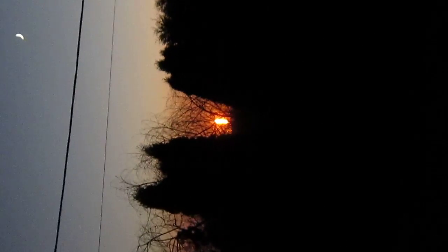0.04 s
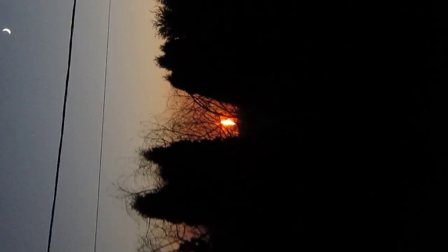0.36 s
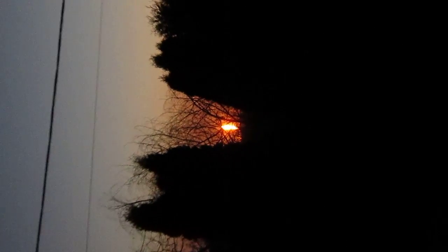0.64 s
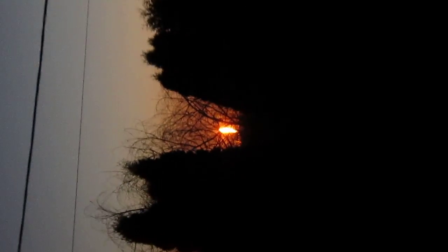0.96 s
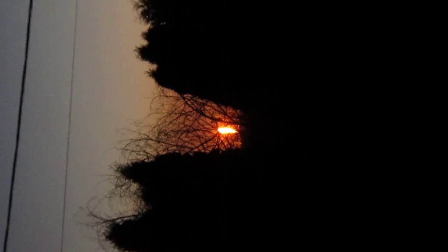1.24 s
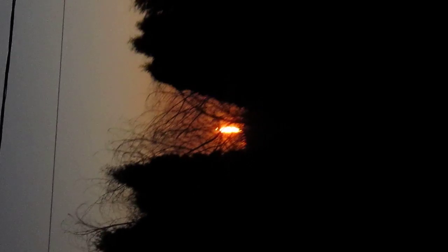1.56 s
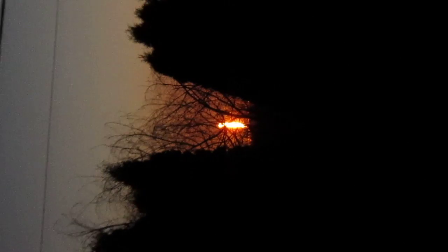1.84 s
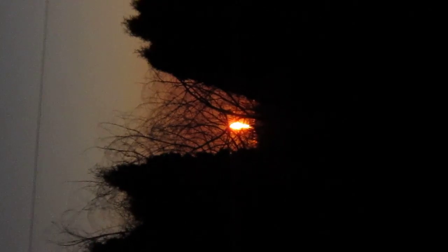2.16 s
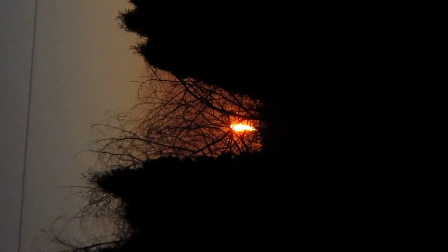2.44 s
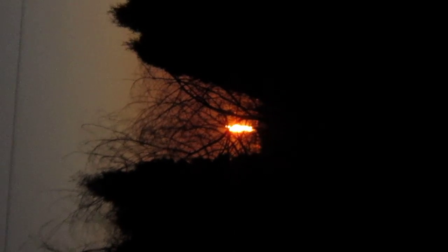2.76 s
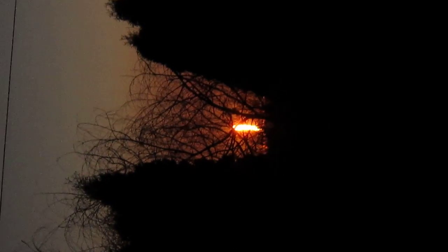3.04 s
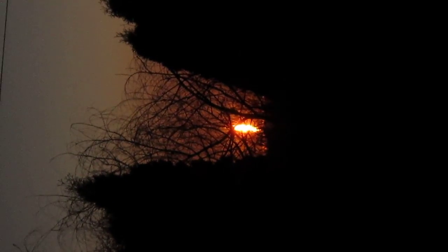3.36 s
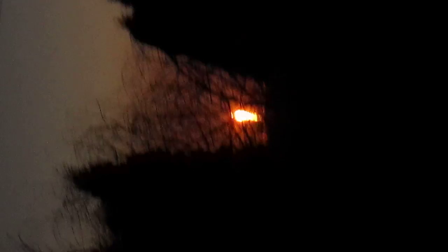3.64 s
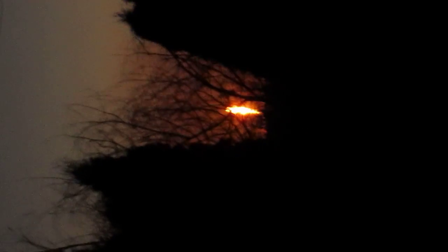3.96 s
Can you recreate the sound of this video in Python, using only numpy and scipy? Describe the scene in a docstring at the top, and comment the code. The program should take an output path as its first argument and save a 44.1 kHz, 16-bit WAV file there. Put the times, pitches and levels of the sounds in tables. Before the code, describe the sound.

Outdoors, over a steady far-off roar and light wind rumbling on the microphone, a camera lens zooms with a quiet, ticking motor whirr. Late on, the camera body gives a sharp click and brief scuffs just before the motor stops.

```python
"""A camera's zoom motor whirrs close by: its steps ring the lens housing, it ticks once a turn,
and now and then its gears catch. Near the end come a sharp click and short scuffs on the camera
body, and the motor stops. Behind it, outdoors at dusk: a steady distant roar, light wind
rumbling on the microphone, and the camera's faint hiss and hum."""
import sys
import numpy as np
from scipy.fft import rfft, irfft, next_fast_len
from scipy.io import wavfile
from scipy.ndimage import map_coordinates

SR = 44100
rng = np.random.default_rng(int(sys.argv[2]) if len(sys.argv) > 2 else 0)


def dump(signal):
    """Clip the signal to [-1, 1] and save it as 16-bit WAV at the path in sys.argv[1]."""
    limited = np.clip(np.atleast_2d(signal).T, -1, 1)
    pcm = np.round(limited * 32767).astype(np.int16)
    wavfile.write(sys.argv[1], SR, pcm)


N = 176400
TIME_S = np.arange(N) / SR


def amp(db):
    """Decibels to gain."""
    return 10 ** (np.asarray(db) / 20)


def unit(x):
    """Scale to rms 1."""
    return x / np.sqrt(np.mean(x ** 2) + 1e-20)


def envelope(rows):
    """Gain per sample from (time_s, level_db) rows."""
    return amp(np.interp(TIME_S, *np.transpose(rows)))


def wobble(rate_hz):
    """Smooth random curve."""
    return map_coordinates(rng.standard_normal(int(N * rate_hz / SR) + 4), [TIME_S * rate_hz])


def coloured(x, spectrum):
    """Minimum-phase, unit-energy filter from (freq_hz, gain_db) rows; 48 dB/octave skirts."""
    size = 2 * next_fast_len(N // 2 + SR // 4)
    freq_hz, gain_db = np.transpose(spectrum)
    octave, knots = np.log2(np.fft.rfftfreq(size, 1 / SR) + 1), np.log2(freq_hz)
    outside = np.abs(octave - np.clip(octave, knots[0], knots[-1]))
    gain = amp(np.maximum(np.interp(octave, knots, gain_db) - 48 * outside, -120))
    cepstrum = irfft(np.log(unit(gain)), size)
    cepstrum[1:size // 2] *= 2
    cepstrum[size // 2 + 1:] = 0
    return irfft(rfft(x, size) * np.exp(rfft(cepstrum)), size)[:N]


def noise(spectrum):
    """Coloured noise, rms 1."""
    return unit(coloured(rng.standard_normal(N), spectrum))


def strikes(hits, modes, rise_s=.0001, scatter_db=1):
    """Each hit rings the decaying modes in a slightly new mix."""
    t, out = np.arange(SR // 20) / SR, np.zeros(N + SR)
    pitch_hz, mode_db, t60_s = np.transpose(modes)[:, :, None]
    for start_s, level_db in hits:
        mix, phase = rng.standard_normal((2, len(pitch_hz), 1))
        decay = amp(level_db + mode_db + scatter_db * mix - 60 * t / t60_s)
        ring = decay * np.sin(2 * np.pi * (pitch_hz * t + phase))
        out[round(start_s * SR):][:len(t)] += ring.sum(0) * (1 - np.exp(-t / rise_s))
    return out[:N]


# Roar and bass spectra: freq_hz, gain_db
ROAR_SPECTRUM = [(185, -8), (210, 0), (265, -1), (320, -4), (365, -5), (440, -11.5), (560, -9), (680, -5),
                 (820, -4.5), (1000, -13.5), (1200, -16), (1550, -16.5), (1800, -23), (2100, -34),
                 (2600, -38)]
BASS_SPECTRUM = [(70, -3.5), (90, 0.5), (125, -0.5), (160, -2.5), (180, -7)]
# Roar and bass envelopes: time_s, level_db
ROAR_ENVELOPE = [(0, -41.5), (.5, -42.5), (1.1, -42.5), (2.2, -42.3), (2.4, -41.5), (2.75, -42.5),
                 (2.95, -41), (3.15, -42.5), (3.35, -42), (3.6, -43), (4, -43)]
BASS_ENVELOPE = [(0, -41), (.3, -50), (.55, -45), (1.1, -46.5), (1.3, -50), (1.6, -50.5), (1.75, -46),
                 (2.2, -50.5), (2.4, -47.5), (2.8, -49.5), (3.35, -45), (3.6, -48.5), (3.8, -44.5),
                 (4, -52.5)]


def distant_roar():
    """The far roar wavers slightly, its bass more."""
    roar = envelope(ROAR_ENVELOPE) * noise(ROAR_SPECTRUM)
    bass = envelope(BASS_ENVELOPE) * noise(BASS_SPECTRUM)
    return roar + bass


# Wind rumble and draught spectra: freq_hz, gain_db
RUMBLE_SPECTRUM = [(36, -1), (44, 0.5), (57, 5), (66, 2.5), (78, -15.5), (110, -21)]
DRAUGHT_SPECTRUM = [(14, 1), (24, 8), (32, 3), (60, -7.5)]
# Gusts: time_s, level_db
RUMBLE_ENVELOPE = [(0, -46), (.1, -50), (.42, -51), (.57, -46), (.75, -55), (.95, -55), (1.08, -45.5),
                   (1.2, -52), (1.41, -39.5), (1.55, -49.5), (2.08, -42.5), (2.27, -54), (2.42, -42),
                   (2.66, -42.5), (2.8, -46), (2.95, -42), (3.1, -56), (3.3, -41), (3.44, -42.5),
                   (3.52, -44), (3.64, -41.5), (3.75, -44.5), (4, -45.5)]


def wind(draught_db=-55):
    """Air on the microphone: a rumble swells and sinks over a slow draught."""
    rumble = envelope(RUMBLE_ENVELOPE) * noise(RUMBLE_SPECTRUM)
    return rumble + amp(draught_db) * noise(DRAUGHT_SPECTRUM)


# Hum lines: pitch_hz, rms_db
HUM_LINES = [(121.7, -56), (1501, -70), (1600.5, -69), (3708.5, -76.5), (4108, -80)]
# Microphone hiss: freq_hz, gain_db
HISS_SPECTRUM = [(1000, -5.5), (2000, -4), (3600, 2.5), (5000, -2.5), (8000, -6.5), (11000, -6),
                 (15500, -30)]


def camera_floor(drift_rad=.96, hiss_db=-69.5):
    """Microphone hiss and faint, slightly unsteady hum."""
    hum = sum(np.sqrt(2) * amp(rms_db) * np.sin(2 * np.pi * hz * TIME_S + drift_rad * wobble(5.29))
              for hz, rms_db in HUM_LINES)
    return hum + amp(hiss_db) * noise(HISS_SPECTRUM)


# Click on the body: start_s, level_db
CLICK_HITS = [(3.7114, -22)]
# Its ring: pitch_hz, gain_db, t60_s
CLICK_MODES = [(1520, -6.5, .013), (1950, -11.5, .012), (2500, -19, .009), (3200, -17, .007),
               (5300, -6, .005), (6000, -8, .004), (7200, -12, .004), (9500, -7, .003), (10300, -2, .007),
               (11500, -12, .003), (13100, -16, .003)]
# Scuffs on the body: centre_s, half_length_s, level_db
SCUFF_STROKES = [(3.713, 0.021, -47.5), (3.811, 0.015, -46.5)]
# Their friction noise: freq_hz, gain_db
SCUFF_SPECTRUM = [(1200, 0), (2000, 1), (3000, 5), (4000, 0), (5200, 5), (7000, -7), (10000, -7.5),
                  (15500, -16)]


def body_contact():
    """A bright click and two soft scuffs on the camera body."""
    rub = sum(amp(level_db) * np.exp(-((TIME_S - centre_s) / half_s) ** 2)
              for centre_s, half_s, level_db in SCUFF_STROKES)
    return strikes(CLICK_HITS, CLICK_MODES) + rub * noise(SCUFF_SPECTRUM)


# Gear catches: start_s, snap_db, knock_db
CATCH_HITS = [(0.172, -44, -49), (0.347, -46, -58), (0.367, -46, -57), (1.0515, -45.5, -43),
              (1.4585, -43.5, -50), (1.718, -46, -54), (1.7674, -49, -51), (1.9335, -46, -56),
              (2.4, -38, -42), (2.5272, -42, -44), (2.8232, -47, -55), (2.8831, -45, -45),
              (3.0796, -45, -51), (3.551, -44, -42.5), (3.7644, -43, -52), (3.962, -54, -66)]
# Tooth snap and woody case knock: pitch_hz, gain_db, t60_s
TOOTH_MODES = [(2420, -5, 0.013), (2890, -7, .016), (3050, -4, 0.014), (3700, -5.5, 0.017),
               (4180, -6.5, 0.0098), (5540, 0, .006)]
CASE_MODES = [(1280, -7, .018), (1614, 4, 0.032), (1750, -9, .016)]


def gear_catches():
    """Catching teeth snap and knock the case."""
    start_s, snap_db, knock_db = np.transpose(CATCH_HITS)
    return strikes(zip(start_s, snap_db), TOOTH_MODES) + strikes(zip(start_s, knock_db), CASE_MODES)


MOTOR_STOP_S = 3.938
# Tick ring, duller as the lens travels out: pitch_hz, start_db, stop_db
TICK_RING = [(3030, -16, -4), (5780, -.5, 0.5), (6360, 3, -6), (7050, 2, 1.5), (8620, -8.5, -2),
             (9650, -1.5, 0.5), (10470, 3, -5)]
# Loud ticks: time_s, low_db, middle_db, high_db
LOUD_TICKS = [(0.1223, -44, -46, -50), (0.1523, -47, -60, -49), (0.1807, -60, -60, -44),
              (0.2103, -45, -60, -50), (0.2404, -47, -60, -56), (0.2704, -59, -60, -43),
              (0.297, -60, -50, -49), (0.3277, -51, -60, -51), (0.3576, -50, -60, -53),
              (0.7744, -60, -60, -49), (0.804, -47, -60, -55), (0.8337, -60, -60, -46),
              (1.0114, -60, -41, -52), (1.2798, -48, -60, -52), (1.4897, -55, -60, -48),
              (1.5197, -53, -50, -46), (1.5496, -60, -60, -48), (1.5795, -52, -43, -54),
              (1.6382, -60, -50, -44), (1.6979, -60, -45, -50), (1.9341, -58, -50, -50),
              (1.9645, -57, -42, -49), (2.1718, -50, -40, -48), (2.2019, -54, -46, -46),
              (2.2316, -60, -60, -46), (2.2616, -47, -42, -52), (2.3502, -60, -41, -49),
              (2.3804, -58, -41, -48), (2.6131, -51, -44, -49), (2.6433, -48, -41, -50),
              (2.8829, -48, -41, -48), (2.9112, -60, -60, -46), (2.9996, -60, -40, -52),
              (3.0595, -58, -38, -49), (3.1492, -48, -48, -50), (3.2095, -48, -41, -55),
              (3.2977, -38, -45, -46), (3.3276, -43, -37, -46), (3.5364, -50, -40, -50),
              (3.5641, -47, -41, -50), (3.6243, -46, -37, -55), (3.6543, -47, -45, -54),
              (3.6842, -57, -41, -45), (3.7441, -56, -39, -50), (3.8344, -47, -43, -51),
              (3.8946, -54, -39, -56)]


def turn_ticks(turns, length_s=.003, spread_db=2, scatter_db=1.2, detune_ratio=.015):
    """A rough spot scrapes the housing once a turn: mostly softly, at times loudly."""
    bands_hz, soft_db = [6000, 7000, 8700], np.array([-57, -58, -54])
    t = np.arange(int(length_s * SR)) / SR
    pitch_hz, start_db, stop_db = np.transpose(TICK_RING)[:, :, None]
    loud_db = {round(np.interp(time_s, TIME_S, turns)): dbs for time_s, *dbs in LOUD_TICKS}
    out = np.zeros(N + len(t))
    for turn in range(1, int(turns[-1])):
        time_s = np.interp(turn, turns, TIME_S)
        mix, detune, phase = rng.standard_normal((3, len(pitch_hz), 1))
        bands_db = loud_db.get(turn, soft_db + spread_db * rng.standard_normal())
        travel_db = start_db + (stop_db - start_db) * time_s / MOTOR_STOP_S
        gain = amp(np.interp(pitch_hz, bands_hz, bands_db) + travel_db + scatter_db * mix)
        ring = gain * np.sin(2 * np.pi * (pitch_hz * (1 + detune_ratio * detune) * t + phase))
        out[int((time_s - length_s / 2) * SR):][:len(t)] += ring.sum(0) * np.hanning(len(t))
    return out[:N]


def motor_turns(turn_hz=33.66):
    """Turns so far: a nearly even pace, each loud tick on a whole turn."""
    tick_s = np.transpose(LOUD_TICKS)[0]
    whole_turns = np.cumsum(np.round(np.diff(tick_s, prepend=0) * turn_hz))
    return turn_hz * TIME_S + np.interp(TIME_S, tick_s, whole_turns - turn_hz * tick_s)


# Six steps of one turn: gain_db
STEP_ACCENTS_DB = [-1, 1, -4, 4, -5.5, 0.5]
# Lens housing response: freq_hz, gain_db
HOUSING_SPECTRUM = [(2000, -47), (3000, -19.5), (3700, -5.5), (4400, -15.5), (5300, -18), (6200, -17.5),
                    (6750, 4), (7250, 10), (7700, 5.5), (8300, -24), (9000, -40), (9650, -36), (10450, -11),
                    (11300, -40), (12800, -38), (14300, -34), (15800, -30)]


def motor_steps(steps, rms_db=-56, jitter_s=.00017, spread_db=.8):
    """Each step knocks the lens housing."""
    count = int(steps[-1])
    jitter, spread = rng.standard_normal((count, 2)).T
    start_s = np.interp(np.arange(count), steps, TIME_S) + jitter_s * jitter
    samples = np.clip(np.round(start_s * SR).astype(int), 0, N - 1)
    sizes = amp(np.resize(STEP_ACCENTS_DB, count) + spread_db * spread)
    return amp(rms_db) * unit(coloured(np.bincount(samples, sizes, N), HOUSING_SPECTRUM))


# Sliding gears and rubbing lens barrel: freq_hz, gain_db
WHIRR_SPECTRUM = [(1700, -7.5), (2400, -1), (2900, 3), (3300, 0.5), (3700, 3), (3900, 3), (4100, 2),
                  (4350, -4.5), (5200, 0), (6200, -7.5), (7200, 7), (8500, -13), (9600, -6), (10400, 2),
                  (11500, -10.5), (14300, -23), (15500, -30)]
SWISH_SPECTRUM = [(12700, -8), (13400, 0), (14100, 0), (14700, -7)]
# Their envelopes: time_s, level_db
WHIRR_ENVELOPE = [(0, -56.5), (1.5, -57.5), (3.2, -56.5), (3.9, -55.5)]
SWISH_ENVELOPE = [(1.5, -84), (2.4, -75), (3.5, -75), (3.9, -79)]


def zoom_motor(run_down_s=.011, pulse_depth=.5, swish_lag_turns=.4):
    """Gears whirr in time with the steps; each turn brings a tick, then a thin barrel swish."""
    turns = motor_turns()
    steps = turns * len(STEP_ACCENTS_DB)
    knocks = motor_steps(steps)
    step_pulse = 1 + pulse_depth * np.cos(2 * np.pi * steps)
    whirr = envelope(WHIRR_ENVELOPE) * noise(WHIRR_SPECTRUM) * step_pulse
    turn_pulse = np.cos(np.pi * (turns - swish_lag_turns)) ** 2
    swish = envelope(SWISH_ENVELOPE) * noise(SWISH_SPECTRUM) * turn_pulse
    running = np.clip((MOTOR_STOP_S - TIME_S) / run_down_s, 0, 1)
    return running * (knocks + whirr + swish + turn_ticks(turns))


def scene():
    """Mono sum at the microphone."""
    background = distant_roar() + wind() + camera_floor()
    return (background + zoom_motor() + gear_catches() + body_contact())[None]


# Camera notch filters: centre_hz, half_width_hz
NOTCH_BANDS = [(3930, 95), (7860, 46)]


def record(dry):
    """The camera cuts two narrow notches and everything above its band limit."""
    limit_hz = 15760
    size = next_fast_len(N + SR // 2)
    freq_hz = np.fft.rfftfreq(size, 1 / SR)
    notches = np.prod([1j * (freq_hz - centre_hz) / (half_hz + 1j * (freq_hz - centre_hz))
                       for centre_hz, half_hz in NOTCH_BANDS], axis=0)
    return irfft(rfft(dry, size) * notches * (freq_hz < limit_hz), size)[:, :N]


dry = scene()
out = record(dry)
dump(out)
```